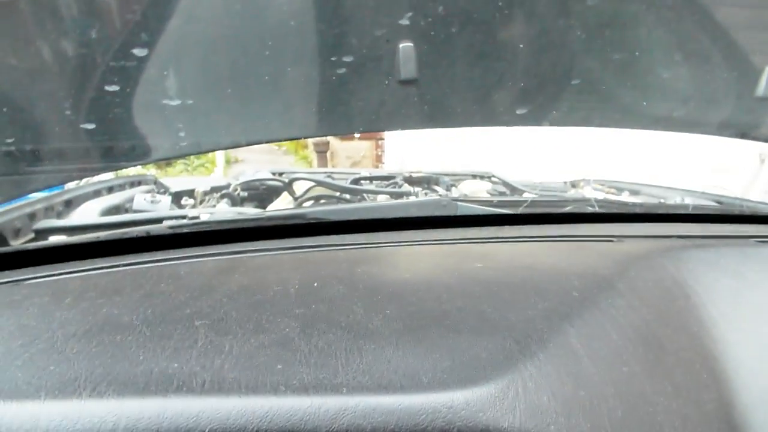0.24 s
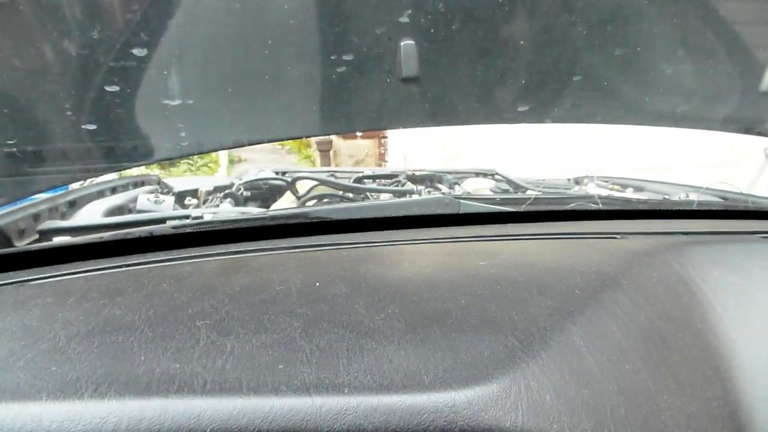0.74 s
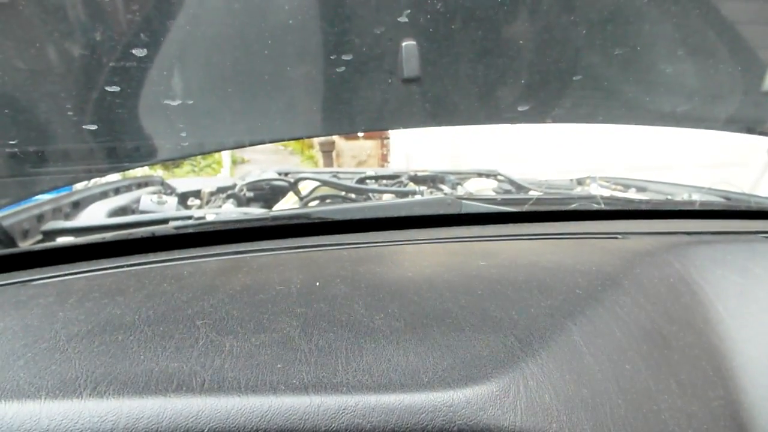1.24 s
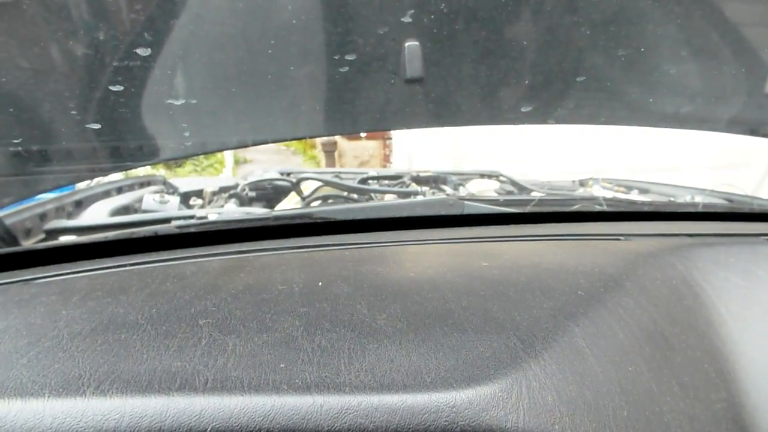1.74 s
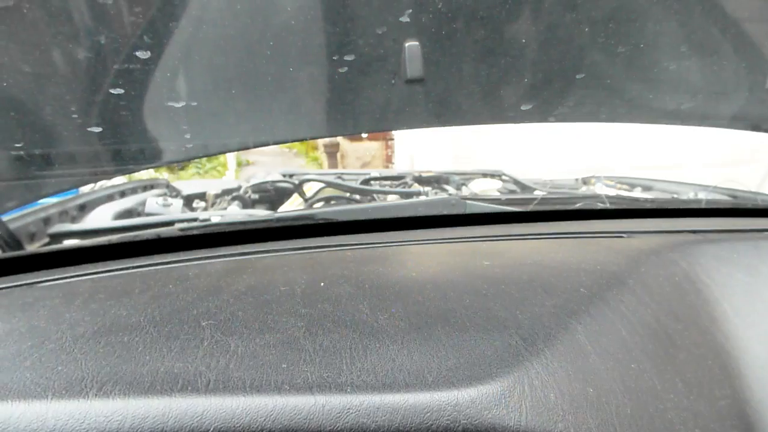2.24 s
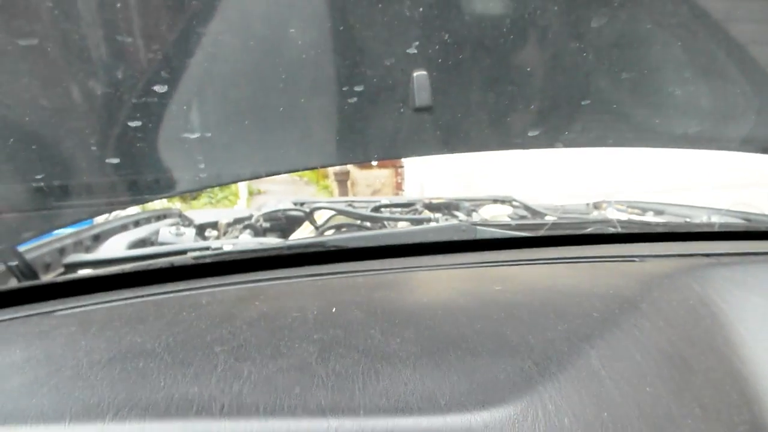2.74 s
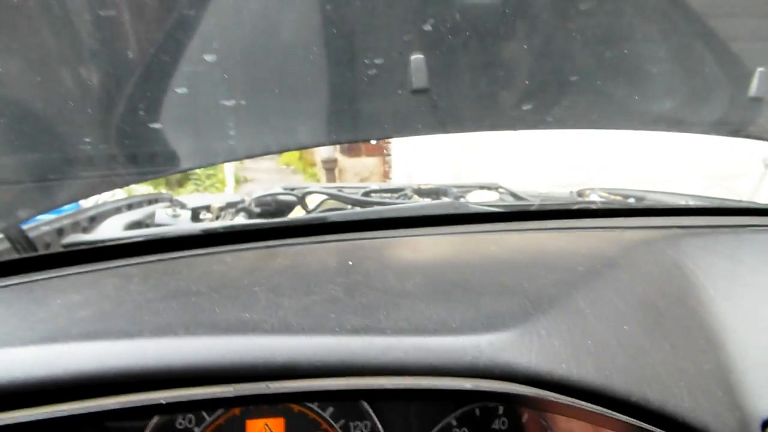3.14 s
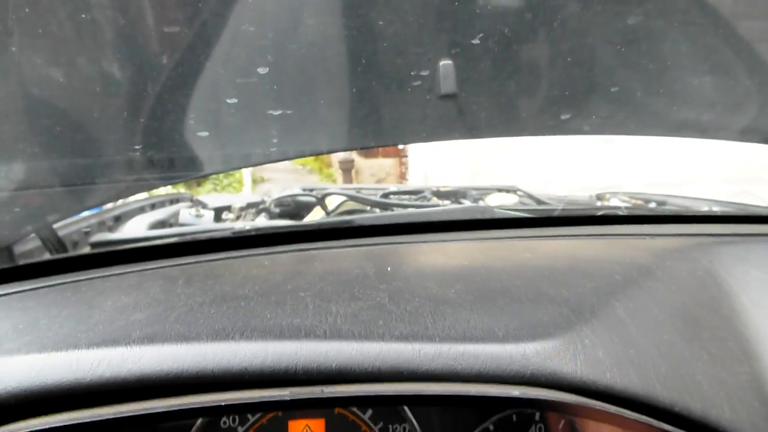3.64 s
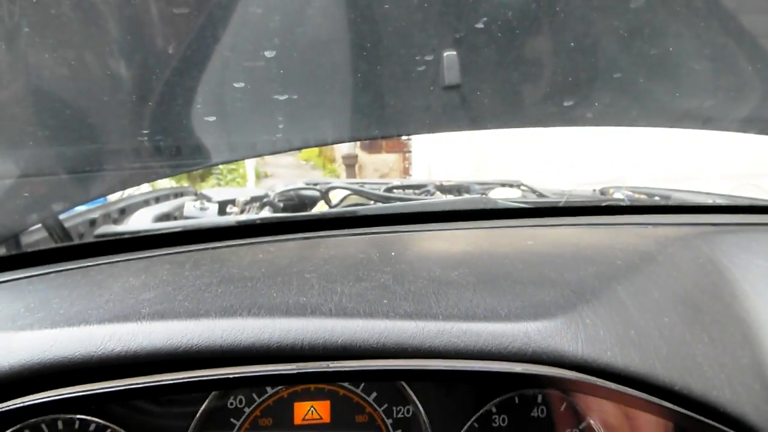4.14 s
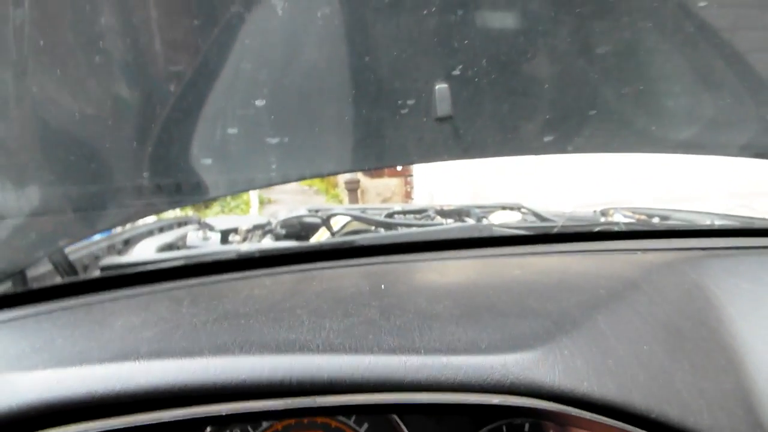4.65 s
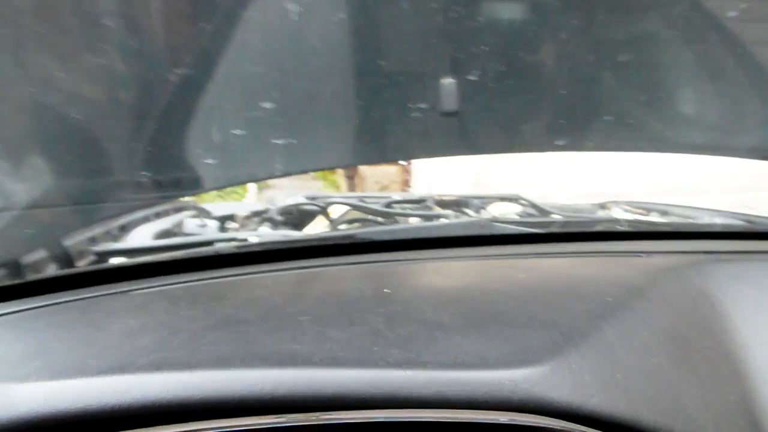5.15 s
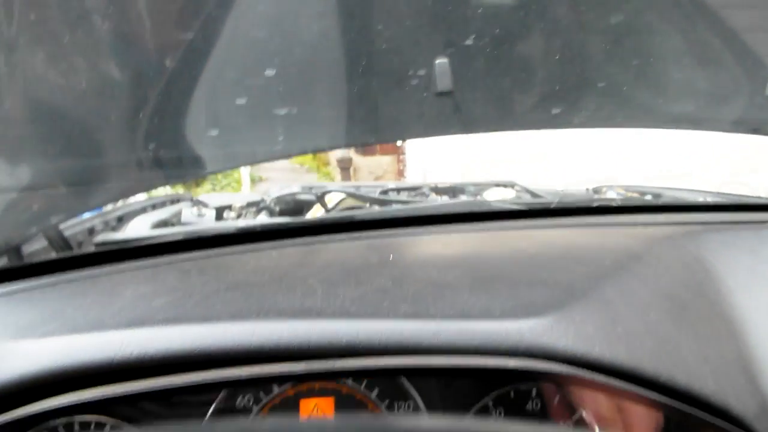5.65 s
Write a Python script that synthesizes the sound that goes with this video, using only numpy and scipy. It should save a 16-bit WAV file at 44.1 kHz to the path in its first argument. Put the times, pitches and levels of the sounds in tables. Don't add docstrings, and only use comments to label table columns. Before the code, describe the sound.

From the driver's seat of a car with its bonnet raised, a starter motor cranks continuously. The nasal, gear-toothed whine pulses about nine times a second, sagging under each compression. A loose part knocks roughly twice a second over rattling, hiss and a deep rocking boom. The engine never catches. Two close microphones, small cabin, partly shaded by a hand midway.

```python
import sys
import numpy as np
from scipy import signal
from scipy.fft import rfft, irfft
from scipy.io import wavfile
from scipy.ndimage import uniform_filter1d

SR = 44100
rng = np.random.default_rng(int(sys.argv[2]) if len(sys.argv) > 2 else 0)


def ratio(d):
    e = np.asarray(d, float) / 20
    return 10 ** e


def digitize_waveform(pressure):
    field = np.atleast_2d(pressure).T
    bounded = np.clip(field, -1, 1)
    quanta = np.round(bounded * 32767).astype(np.int16)
    wavfile.write(sys.argv[1], SR, quanta)


N = 259308
TIME = np.arange(N) / SR

# (time [s], mean tooth rate [Hz], whine [dB], third multiple [dB], fourth multiple [dB])
TURNS = [(-.14, 326.3, -5.5, -10, -2), (.314, 330, -4, 1.5, 3.5), (.768, 332.8, 0.5, 1, -2.5),
         (1.205, 336.9, -3.5, 4, 5.5), (1.657, 323, 0.5, -3, -3), (2.125, 324, -2.5, 1.5, 3.5),
         (2.583, 322.7, -0.5, 0, -0.5), (3.049, 324, -1.5, -1, -0.5), (3.511, 322.7, 1.55, 1, -2),
         (3.977, 324.1, -2, -0.5, 0), (4.433, 326.4, 0.5, 1, -1.5), (4.892, 327.3, 0, 1.5, 2),
         (5.354, 324.9, 0, 1.5, 4.5), (5.821, 331, -2, 3.5, -7), (6.285, 322, 0.5, -3, -3)]
# (time [s], peak [dB], low thud [dB])
KNOCKS = [(0.314, -20.5, -36), (0.767, -20, -34), (1.07, -26.5, -37), (1.205, -22, -27), (1.658, -21, -26),
          (2.124, -17, -31.5), (2.583, -19, -26), (3.049, -23.5, -29.5), (3.511, -19.5, -28),
          (3.856, -24, -46), (3.983, -21, -26), (4.433, -23, -27.5), (4.892, -20, -32), (5.354, -20.5, -26),
          (5.823, -21.5, -29)]
# (frequency [Hz], level [dB per Hz], swing with load [dB])
RUSH = [(60, -15, 0.5), (105, -17, 4.5), (222, -1.5, -3), (390, -17, 3.5), (787, -1, -1), (1280, -13, 4),
        (1640, -13.5, 1.5), (3000, -12.5, 1.5), (4900, -16, 0), (7800, -20, 3.5), (12400, -18, -1),
        (14900, -39, 8)]


def along(table, hz, column):
    rows = np.array(table, float)
    return np.interp(np.log(np.maximum(hz, 1)), np.log(rows[:, 0]), rows[:, column])


def level(x, db):
    return x * ratio(db) / np.sqrt(np.mean(x ** 2))


def band(x, hz, width):
    return signal.lfilter(*signal.iirpeak(min(hz, .45 * SR), hz / width, SR), x)


def walk(rate):
    k = int(SR / rate)
    steps = np.repeat(rng.standard_normal(N // k + 1), k)
    return 1.355 * uniform_filter1d(uniform_filter1d(steps, k), k)[:N]


def ring(hz, t60, soft_s):
    t = TIME[:SR // 2]
    return np.sin(2 * np.pi * hz * t) * 1000. ** (-t / t60) * (1 - np.exp(-t / soft_s))


def add(out, at_s, sound):
    i = int(at_s * SR)
    out[i:i + len(sound)] += sound[:max(len(out) - i, 0)]


def load(stroke, peak, sharp=1):
    return (.5 + .5 * np.cos(2 * np.pi * (stroke - peak))) ** sharp


def crank():
    # (slack at [turns], fast tooth rate [Hz], slow tooth rate [Hz])
    cylinders = [(.14, 327.3, 308.2), (.4, 334.3, 294.9), (.66, 342.2, 312.3), (.885, 346.3, 303.6),
                 (1.135, 340.5, 304.4), (1.38, 351.1, 330.9), (1.61, 343.4, 304.8), (1.88, 316.6, 311.1)]
    # (whine [dB], third multiple [dB], fourth multiple [dB])
    effort = [(-29, -34.5, -38.5), (-28, -36, -37.5), (-27, -34.5, -40), (-25, -37, -39.5),
              (-27, -35, -41.5), (-29, -36, -41.5), (-27, -35.5, -36), (-29, -37, -37.5)]
    # (whine [dB], third multiple [dB], fourth multiple [dB])
    scatter = (.6, .7, 2)
    # (time [s], slow tooth rate shift [Hz], whine [dB])
    odd_strokes = [(.388, 0.5, 2), (.583, -15, 1), (.718, -16, 1.5), (.931, 6, -2.5), (1.959, -7, 0.5),
                   (2.648, -8, 4), (2.998, 22, 0), (3.106, -6, 2.5), (4.498, 2.5, -0.5), (4.736, 21, -0.4),
                   (4.955, -5, 0), (5.179, -3, -0.5), (5.305, -17, 1), (5.658, 14, 1)]
    mean_tooth_hz = 324
    turn_s, turn_hz, *turn_db = np.transpose(TURNS)
    turn_count = np.arange(len(TURNS))
    cycles = len(TURNS) // 2
    at, fast_hz, slow_hz = np.tile(np.transpose(cylinders), cycles)
    count = np.arange(len(at))
    at = at + 2 * (count // len(cylinders))
    slack_s = np.interp(at, turn_count, turn_s)
    stroke = np.interp(TIME, slack_s, count)

    odd_s, shift_hz, odd_db = np.transpose(odd_strokes)
    odd = np.abs(slack_s - odd_s[:, None]).argmin(axis=1)
    slow_hz[odd] += shift_hz
    knots = np.ravel([count + .1, count + .24, count + .64, count + .84], "F")
    hz = np.interp(stroke, knots, np.ravel([fast_hz, fast_hz, slow_hz, slow_hz], "F"))
    hz = hz * np.interp(TIME, turn_s, turn_hz) / mean_tooth_hz

    effort_db = np.tile(np.transpose(effort), cycles) + [np.interp(at, turn_count, db) for db in turn_db]
    effort_db = effort_db + (scatter * rng.standard_normal((len(at), len(scatter)))).T
    effort_db[0, odd] += odd_db
    return stroke, uniform_filter1d(hz, size=400), effort_db


def whine(stroke, hz, effort_db):
    # (multiple, peak [share of stroke], swing [dB], offset [dB], resonance lift [dB], cabin resonances [Hz])
    multiples = [(1, 0.51, 15.5, -6, 4.5, [308]), (3, 0.38, 13.5, -3.5, 2.5, [948, 1036]),
                 (4, 0.45, 10, -0.5, -3.5, [1245, 1335])]
    turns = np.cumsum(hz) / SR
    jolt_db = sum(-15 * np.exp(-((TIME - s - .009) / 0.009) ** 2) for s, *_ in KNOCKS)
    out = 0
    for (k, peak, swing_db, db, lift_db, modes), levels in zip(multiples, effort_db):
        swell_db = swing_db * (load(stroke, peak, sharp=.62) - 1)
        now = stroke.astype(int).clip(0, len(levels) - 1)
        stroke_db = uniform_filter1d(levels[now], size=1200)
        flutter_db = 1.2 * walk(50)
        gain = ratio(stroke_db + db + swell_db + flutter_db + jolt_db)
        phase = 2 * np.pi * round(k) * turns + .05 * k * walk(30)
        tone = np.sqrt(2) * gain * np.sin(phase)
        out = out + tone + sum(ratio(lift_db) * band(tone, f, 36.6) for f in modes)
    return out, turns


def rasp(stroke, turns):
    # (multiple, level [dB])
    upper = [(2, -44.5), (5, -46.5), (6, -45), (7, -48), (8, -46.5), (9, -45), (10, -53), (11, -47),
             (12, -50), (14, -51.5), (16, -50.5), (17, -52.5), (21, -63)]
    out = 0
    for k, db in upper:
        flash_db = 12 * (load(stroke, .48) - 1) + 2.6 * walk(26)
        out = out + ratio(db + flash_db) * np.sin(2 * np.pi * k * turns + 0.07 * k * walk(30))
    return ratio(1.5) * out


def hand_shading(path):
    # (time [s], shade [0-1])
    hand_drift = [
        (0, 0.03),
        (1.6, 0.08),
        (2.1, 0.32),
        (2.55, 0),
        (3, .65),
        (3.5, 0.91),
        (4, .6),
        (5, 0.15),
        (5.88, 0.23),
    ]
    # (open level [dB], change when shaded [dB])
    path_levels = [
        (1.96, .6),
        (4, -15),
        (3, -3),
        (-1.5, 5),
    ]
    open_db, change_db = path_levels[["treble", "middle", "rumble", "flecks"].index(path)]
    return open_db + change_db * np.interp(TIME, *np.transpose(hand_drift))


def teeth(stroke, turns):
    # (frequency [Hz], width [Hz], level [dB])
    housing = [(77.8, 4.1, -9), (183.5, 7.9, -2.5), (290, 39, -8.5), (521.6, 16, -8.5), (595, 13, -6.5),
               (752, 22, -9.5), (976, 4.3, 1), (1029, 22, -6), (1226, 82, -11.5), (1352, 42, -12.5),
               (1468.4, 15, -7.5), (1898, 36, -12.5), (2001, 24, -12.5), (2503, 67, -17), (2750, 31, -12),
               (3008, 58, -13), (3325, 35, -12.5), (3468, 64, -16.5), (3895, 24, -15.5), (4402, 29, -15),
               (5380, 140, -21), (5670, 22, -21), (5710, 21, -27), (6880, 84, -22), (10020, 540, -23)]
    hit = np.flatnonzero(np.diff(np.floor(turns + .008 * walk(250))) > 0)
    blows = np.zeros(N)
    blows[hit] = ratio(2.5 * rng.standard_normal(N)[hit])
    blows = level(blows - blows.mean(), 1.5)
    out = 0
    for hz, width, db in housing:
        flecks = 5000 < hz < 6000
        drive = blows * (hz > 1400) + rng.standard_normal(N)
        swing_db = 2 * along(RUSH, hz, column=2) + 6 * flecks
        flare_db = (2.5 if 1700 < hz < 6000 else 1.5) * walk(28)
        path_db = hand_shading("middle") * (1400 < hz < 1700)
        path_db = path_db + hand_shading("rumble") * (hz < 200) + hand_shading("flecks") * flecks
        mode = level(band(drive, hz, width), db + 10 * np.log10(width))
        out = out + mode * ratio(swing_db * load(stroke, 0.53) + flare_db + path_db)
    return level(out, -33.5)


def rush(stroke):
    out, shared_db = 0, .7 * walk(14)
    for hz in 60 * 2 ** np.arange(0, 8.2, 1 / 3):
        pair = band(band(rng.standard_normal((2, N)), hz, hz / 3), hz, hz / 3)
        flicker_db = .6 * walk(14)
        swell_db = along(RUSH, hz, column=2) * 1.5 * load(stroke, 0.45)
        db = along(RUSH, hz, column=1) + swell_db + shared_db + flicker_db
        db = db + hand_shading("treble") * (hz > 2200)
        db = db + hand_shading("middle") * (1400 < hz < 1700) + hand_shading("rumble") * (hz < 200)
        out = out + ratio(db) * pair
    return level(out, -34.0)


def boom():
    # (at [turns], side [+1 or -1], shove [dB])
    shoves = [(.035, 1, -21.8), (.254, -1, -23), (.501, -1, -28.2), (.799, 1, -21.8), (.986, -1, -31),
              (1.295, 1, -24), (1.534, 1, -21.3), (1.755, 1, -30)]
    # (frequency [Hz], side [+1 or -1], level [dB], 60 dB decay [s])
    shell_modes = [(26.15, 1, 0, .316), (40.5, -1, 4.6, .415)]
    shell = sum(side * ratio(db) * ring(hz, t60, soft_s=.06) for hz, side, db, t60 in shell_modes)
    out = np.zeros(N + SR)
    at, side, db = np.tile(np.transpose(shoves), len(TURNS) // 2)
    at = at + 2 * (np.arange(len(at)) // len(shoves))
    times = np.interp(at, np.arange(len(TURNS)), np.transpose(TURNS)[0])
    gains = side * ratio(db + .7 * rng.standard_normal(len(at)))
    for s, gain in zip(times, gains):
        add(out, s + 1, gain * shell)
    return ratio(1.3) * out[SR:]


def bracket():
    # (time [s], peak [dB])
    pings = [(.02, -31.5), (.2, -41), (.67, -44), (1.11, -35), (1.19, -34.5), (1.33, -35), (1.44, -34.5),
             (1.6, -31.5), (1.7, -31.5), (1.79, -31), (1.9, -36), (2.01, -33), (2.21, -35), (2.39, -29),
             (2.6, -31), (2.65, -31.5), (3.29, -28), (3.52, -33), (3.58, -27.5), (4.009, -36),
             (4.24, -31.5), (4.39, -33), (4.47, -26.5), (4.78, -32.5), (5.01, -29), (5.159, -28.5),
             (5.239, -37), (5.389, -24), (5.85, -31)]
    # (time [s], level [dB])
    hum = [(0, -41), (2.4, -57), (2.7, -43), (5.88, -37.5)]
    rise_db_s, fall_db_s = 450, 240
    swells = [db + np.minimum(rise_db_s * (TIME - s), fall_db_s * (s - TIME)) for s, db in pings]
    db = np.maximum(np.max(swells, axis=0), np.interp(TIME, *np.transpose(hum)))
    gain = uniform_filter1d(ratio(db), size=500)
    hz = 820 + 4 * walk(25)
    tone = np.sqrt(2) * gain * np.sin(2 * np.pi * np.cumsum(hz) / SR)
    return tone * ratio(2.5 * walk(30) - 2)


def knocks():
    # (frequency [Hz], level [dB], 60 dB decay [s])
    knock_modes = [(472, -2, 0.067), (517, -6.5, 0.17), (587, -6.5, 0.16), (710, -6, 0.03),
                   (860, -13, 0.03), (1120, -4, 0.089), (1332, -8.5, 0.073), (1566, -10, 0.13)]
    out = np.zeros(N)
    for s, db, thud_db in KNOCKS:
        body = 0
        for hz, mode_db, t60 in knock_modes:
            gain = ratio(mode_db + 1.8 * rng.standard_normal())
            body = body + gain * ring(hz * (1 + 0.027 * rng.standard_normal()), t60, soft_s=.001)
        add(out, s, ratio(db - 1.2) * body)
        add(out, s + .015, ratio(db - 9) * body)
        add(out, s + 0.01463, ratio(thud_db + 7) * ring(275, 0.098, 0.0012))
    return out


def squeaks():
    # (time [s], peak [dB], frequency [Hz])
    squeak_events = [
        (1.8377, -35, 2000),
        (2.7846, -31.5, 2000),
        (3.6994, -35.5, 2000),
    ]
    out = np.zeros(N)
    for s, db, hz in squeak_events:
        add(out, s, ratio(db + 10.5) * ring(hz, 0.12, .015))
    return out


def bumps():
    # (time [s], peak [dB])
    bump_events = [
        (5.701, -27),
        (5.717, -22.5),
    ]
    out = np.zeros(N)
    body = ring(126, 0.08, .003) + ring(260, 0.077, 0.0025) + ring(350, 0.04, 0.0029)
    for s, db in bump_events:
        add(out, s, ratio(db) * body)
    return out


def ports(near, other):
    # (frequency [Hz], likeness [0-1], left minus right [dB])
    port_table = [(40, .985, .4), (80, .96, .4), (150, .96, .4), (300, .985, .3), (600, .975, .4),
                  (1100, .96, .3), (2000, .89, .4), (4000, .66, .8), (7000, .46, -1.8), (10000, .4, -2.2),
                  (12000, .35, 4)]
    lag_s = 2.4e-5
    hz = np.arange(N // 2 + 1) * SR / N
    like = np.clip(along(port_table, hz, column=1), 0, 1)
    half = ratio(along(port_table, hz, column=2) / 2)
    turn = np.exp(1j * np.pi * hz * lag_s)
    mid = rfft(near) * np.sqrt((1 + like) / 2)
    side = rfft(other) * np.sqrt((1 - like) / 2)
    return np.array([irfft((mid + side) * turn * half, N), irfft((mid - side) / turn / half, N)])


def scene():
    stroke, hz, effort_db = crank()
    tone, turns = whine(stroke, hz, effort_db)
    parts = tone + rasp(stroke, turns) + teeth(stroke, turns) + boom()
    parts = parts + bracket() + knocks() + squeaks() + bumps()
    tail = rng.standard_normal(4000) * 1000. ** (-TIME[:4000] / .06)
    scattered = signal.fftconvolve(parts, tail / np.linalg.norm(tail))[:N] * .75 * walk(11)
    near, other = rush(stroke)
    return ports(parts + near, scattered + other)


def low_pass(x):
    return signal.sosfilt(signal.butter(12, 14940, fs=SR, output="sos"), x)


def record(dry):
    return low_pass(dry)


dry = scene()
out = record(dry)
digitize_waveform(out)
```